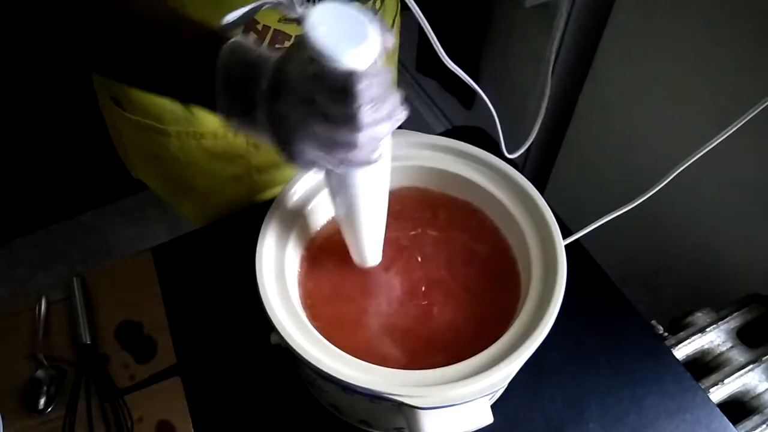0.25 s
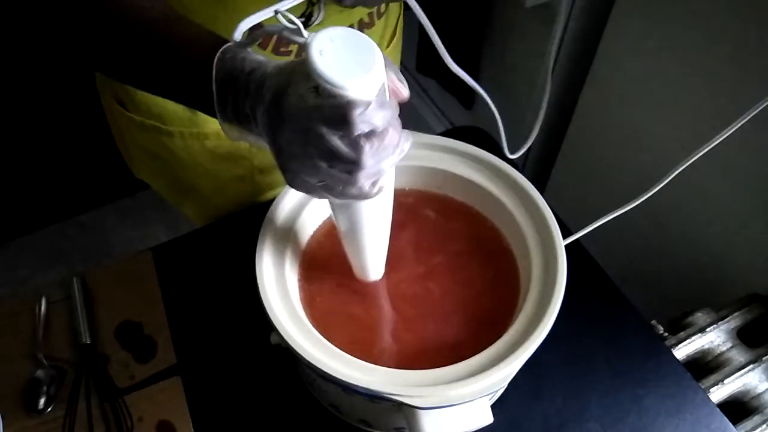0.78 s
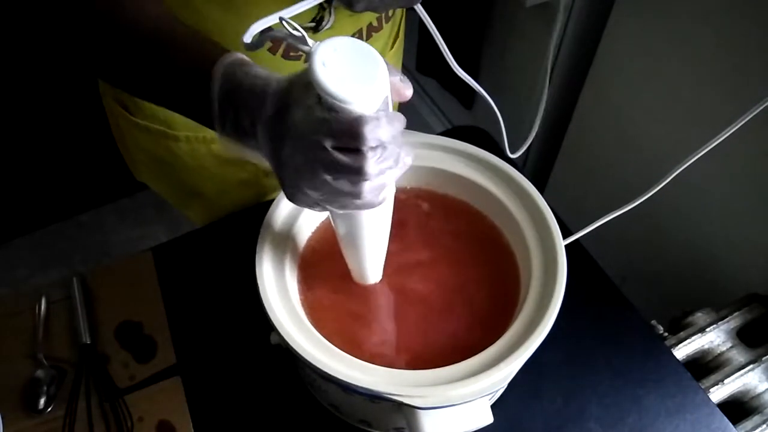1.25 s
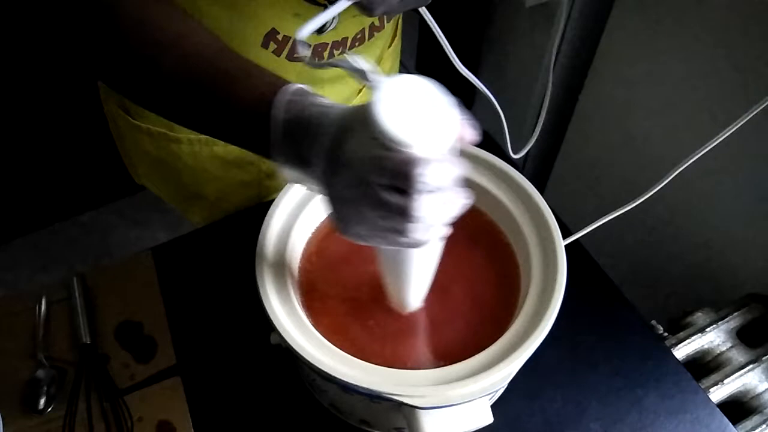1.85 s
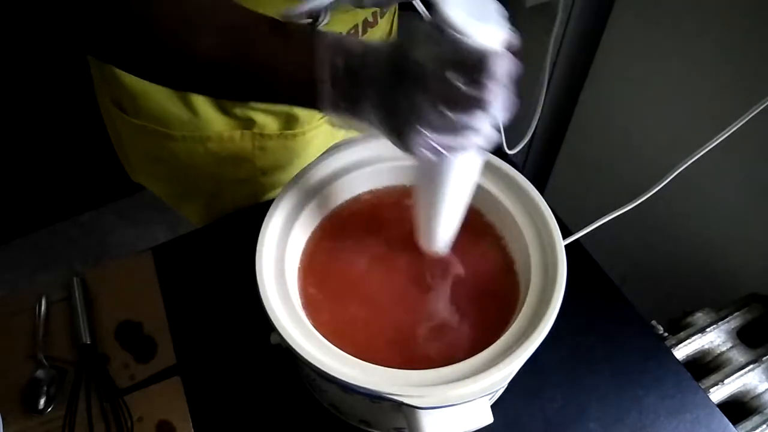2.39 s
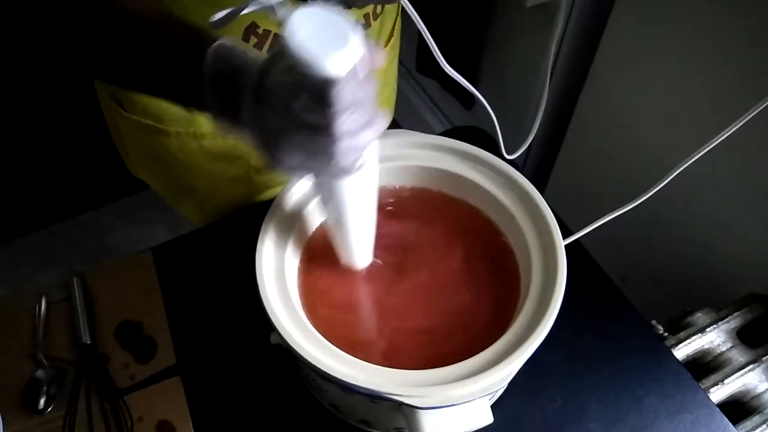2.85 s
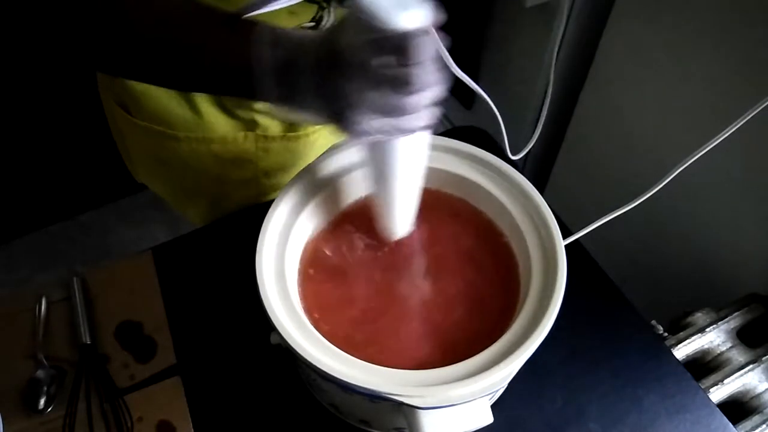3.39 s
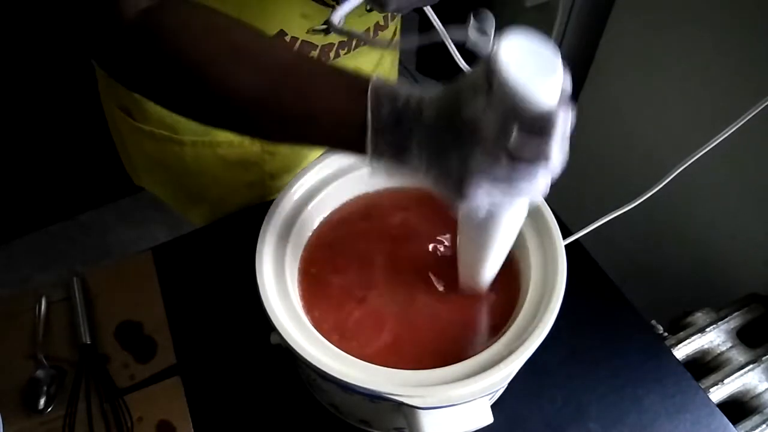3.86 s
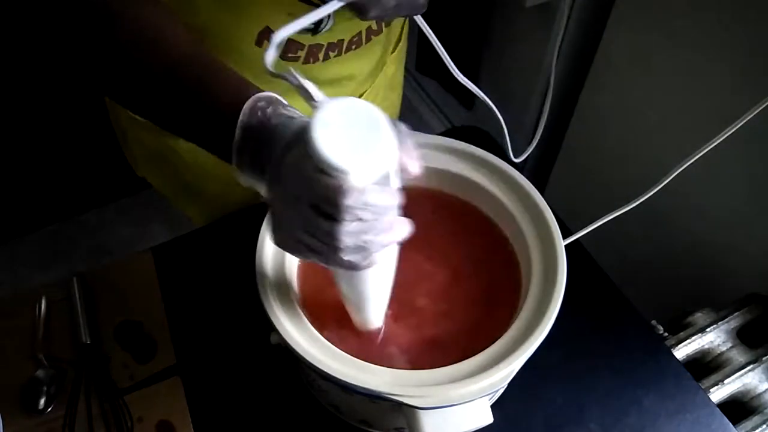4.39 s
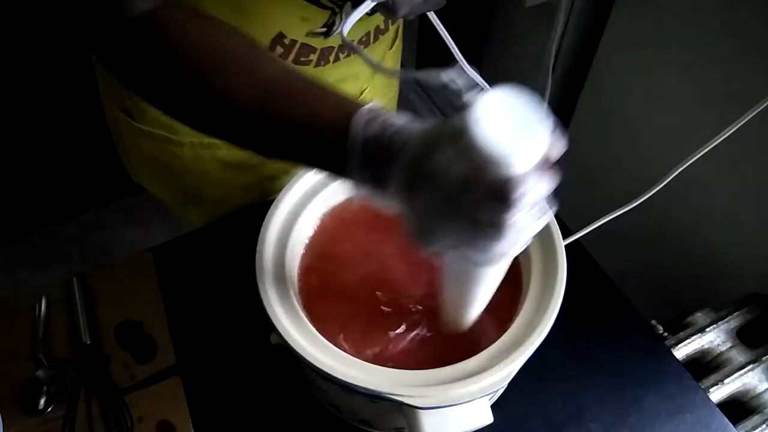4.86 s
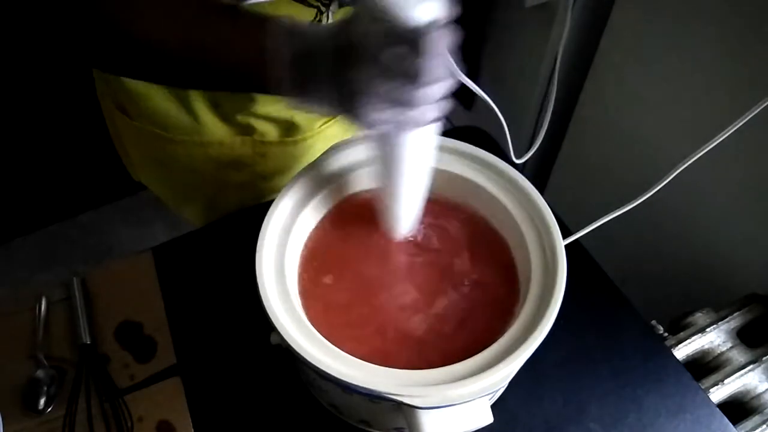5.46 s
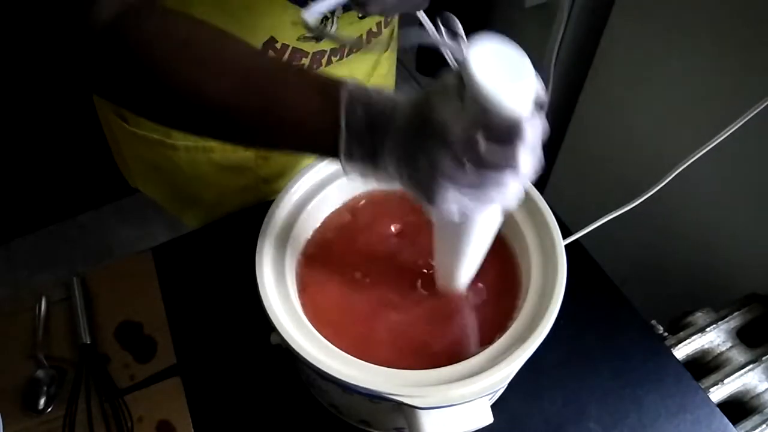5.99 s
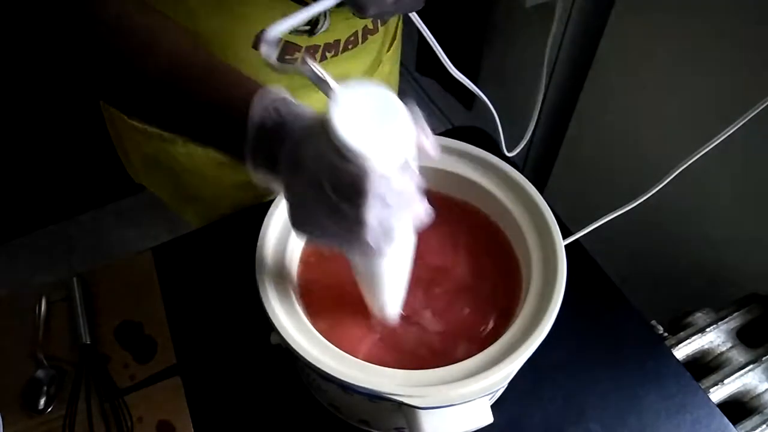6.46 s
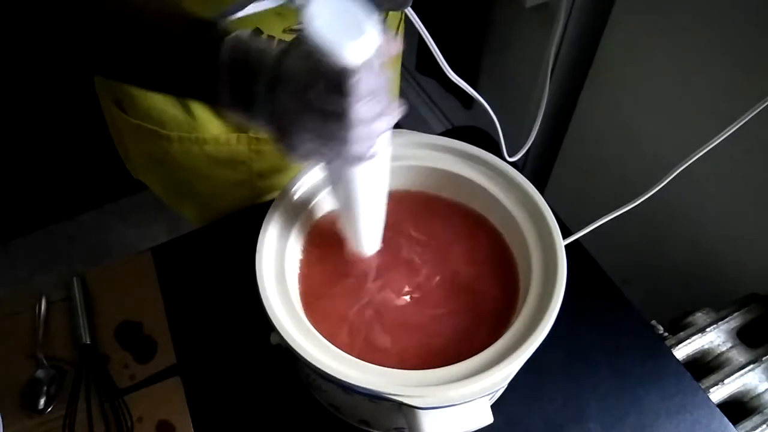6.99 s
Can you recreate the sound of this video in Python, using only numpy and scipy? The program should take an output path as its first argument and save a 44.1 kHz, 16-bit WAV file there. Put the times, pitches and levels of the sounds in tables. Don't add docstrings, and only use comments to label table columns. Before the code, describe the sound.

A hand blender runs under load with a buzzing edge, then coasts down to near silence with tiny brush ticks. A short burst follows and sinks, then the motor restarts and runs to the end, a nasal whine over rough airy roar, shifting as it is stirred. Low thuds of hand and pot. Close stereo microphone in a small kitchen.

```python
import sys
import numpy as np
from scipy import signal
from scipy.fft import rfft, irfft, next_fast_len
from scipy.io import wavfile
from scipy.ndimage import uniform_filter1d

SR = 44100
rng = np.random.default_rng(int(sys.argv[2]) if len(sys.argv) > 2 else 0)


def invert_db(level):
    return 10 ** (np.asarray(level, dtype=float) / 20)


def store_wav(level_fs):
    pcm = np.round(np.clip(np.atleast_2d(level_fs), -1, 1) * 32767)
    wavfile.write(sys.argv[1], SR, pcm.T.astype(np.int16))


N = 319107
T = np.arange(N) / SR
FULL_HZ = 205.9

# (frequency [Hz], left level [dB], right level [dB])
PORT_COLOUR = [(183, -7, -5.5), (283, -12.5, -16), (518, 2, 1), (745, 8.5, 6), (1250, 7, 9),
               (1920, 12, 8.5), (3120, 7, 5.5), (4260, 5.5, 3.2), (5340, -3.5, -2.5), (8840, -6, -19.5),
               (10450, -3, -16), (12130, 3.5, -37), (13350, 0.5, -80), (14800, -17, -74.2)]
# (time [s], foot pressed on the pot, vents turned to the ports, twist of the handle)
HAND_MOVES = [(0.15, -0.5, 0, 0), (1.0, -0.88, 0.5, -0.5), (1.55, -0.79, 0.5, 1.18),
              (1.89, 0.99, 1.45, 0.8), (2.42, 1.87, 1.26, -1.46), (2.72, -0.55, 1.7, 0.37),
              (2.98, -0.95, 0.76, 1.99), (3.31, -1.48, 0.52, -2), (3.97, 0.8, 0.43, -0.26),
              (4.43, -1.36, -0.27, 2), (4.68, -0.12, 0, 1.18), (4.86, -0.24, -0.2, 1.23),
              (5.28, 1.68, 0.92, -2.33), (5.65, -2.02, -0.2, -0.06), (6.03, 1.34, -1.5, -1.56),
              (6.65, 0.95, -1.55, 2.23), (7.02, -2, -1.53, -0.96), (7.2, -0.56, -1.2, 0.7)]


def hand_curves():
    times, *moves = np.transpose(HAND_MOVES)
    return [np.interp(T, times, move) for move in moves]


def follow_hand(db, *db_per_move):
    return db + np.dot(db_per_move, hand_curves())


def walk(rate):
    knots = np.arange(0, N * rate / SR + 1, 1 / 8)
    levels = np.repeat(rng.standard_normal(len(knots) // 8 + 1), 8)
    soft = 1.3 * uniform_filter1d(uniform_filter1d(levels, size=8), size=8)
    return np.interp(np.arange(N) * rate / SR, knots, soft[:len(knots)])


def bell(centre_s, db, spread_s):
    return db * np.exp(-.5 * ((T - centre_s) / spread_s) ** 2)


def level_at(table, hz, column=1):
    table = np.array(table)
    return np.interp(np.log(hz + 1), np.log(table[:, 0]), table[:, column])


def unit(x):
    return x / np.sqrt(np.mean(x ** 2))


def colour(noise, table):
    size = next_fast_len(N)
    hz = np.arange(size // 2 + 1) * SR / size
    return unit(irfft(rfft(noise, size) * invert_db(level_at(table, hz)), size)[..., :N])


def filtered(x, order, hz, kind="low"):
    return signal.sosfiltfilt(signal.butter(order, hz, kind, fs=SR, output="sos"), x)


def tone(phase, db, lag, pan_db, drift):
    lag = lag + drift * walk(1.7)
    pan_db = pan_db + 3.2 * drift * walk(2.37)
    share = np.arctan(invert_db(-pan_db))
    left = np.cos(share) * np.sin(phase)
    right = -np.sin(share) * np.sin(phase - lag)
    return 2 * invert_db(db) * np.array([left, right])


def shaft_speed():
    # (on [s], off [s], full shaft speed [Hz], roar level [dB], coasting time [s])
    presses = [
        (-1, .275, 164, -4.5, .11),
        (.838, 1.065, 206, .5, .17),
        (1.312, 9, 207.3, 0, .17),
    ]
    spin_up_s, friction_hz = .052, 8
    press_hz, twist_hz = 0.335, -0.202
    hz, roar_db = np.zeros(N), np.zeros(N)
    for on, off, top_hz, level_db, coast_s in presses:
        start_hz = hz[max(int(on * SR), 0)]
        held_s = np.clip(np.minimum(T, off) - on, 0, None)
        up_hz = top_hz - (top_hz - start_hz) * np.exp(-held_s / spin_up_s)
        slowing = np.exp(-np.clip(T - off, 0, None) / coast_s)
        run_hz = (up_hz + friction_hz) * slowing - friction_hz
        hz = np.where(T >= on, np.maximum(run_hz, 3), hz)
        roar_db = np.where(T >= on, level_db, roar_db)
    press, _, twist = hand_curves()
    return hz * (1 + (press_hz * press + twist_hz * twist) / FULL_HZ), roar_db


def whine(turn, throb, hz, fade_db):
    # (order, level [dB], per press [dB], per turn [dB], per twist [dB])
    main_orders = [(1, -49, 2, -1.2, 0.4), (2, -48.5, -1, 1.0, 1.8), (3, -41, -0.1, 1, 1.5),
                   (4, -36, 0.3, 1.35, 2.3), (5, -42.5, 0.6, 0.3, 3.5), (6, -40, -2.3, 0.9, -1),
                   (8, -44, -8, 1, 0.5), (9, -46.2, -2, 2.4, -0.8)]
    # (lag from opposition [rad], lag per press [rad],
    # lag per twist [rad], left minus right per press [dB], left minus right per twist [dB])
    path_bends = [(0.62, -0.067, -0.022, 1.4, -.7), (-0.21, -0.19, 0.57, -2.4, -1.4),
                  (0.28, -0.15, 0.0076, -4.5, -0.3), (0.57, 0.24, 0.07, .01, -0.8),
                  (1.4, -0.11, 0.3, -1.3, 4), (-0.46, -0.89, 0.55, 4, -1), (-0.85, -0.028, 0.026, -0.2, .3),
                  (-0.58, 0.45, -.61, 3.5, 3)]
    # (order, level [dB])
    weak_orders = [(7, -77), (10, -47.5), (11, -70), (12, -50), (13, -48.5), (20, -56.5), (24, -50.5)]
    # (lag from opposition [rad], left minus right [dB])
    arrivals = [(0.64, 3.5), (1.0, -2.3), (0.64, 0.1), (0.66, 2.4), (1.45, 2.7), (-1.24, -3.5), (1.01, 2.5),
                (-0.9, 3.6), (-1.25, 0.5), (-1.01, 2.8), (-0.99, 1.6), (-1.35, 2.2), (-1.23, -0.2)]
    # (time [s], order, level [dB], spread [s])
    swells = [(1.06, 4, 4, .06), (1.9, 4, 7, .13), (2.43, 3, -7, .08), (2.67, 3, 9, .05),
              (2.75, 1, 2, 0.15), (2.75, 4, -5, 0.059), (2.75, 8, 7, .08), (2.99, 4, -14, .05),
              (3.35, 6, -3.5, .12), (3.63, 1, -4, 0.058), (3.75, 3, -4, 0.039), (4.07, 1, 6, 0.11),
              (4.45, 2, 0, 0.11), (4.51, 9, 10, 0.12), (4.71, 8, -5, .05), (4.75, 1, -8, 0.1),
              (4.86, 4, 5, .12), (5.11, 3, 2.5, 0.2), (5.23, 1, 6.5, 0.27), (5.43, 6, -10, 0.055),
              (5.51, 3, 6, 0.039), (5.63, 4, 2, 0.046), (5.81, 4, 4, .04), (5.87, 1, -6, .05),
              (5.97, 4, 4, .07), (6.35, 8, 18, 0.066), (6.58, 4, 5, .1), (6.99, 4, 7.5, .08),
              (7.06, 8, 3, .07), (7.15, 6, -19, .12)]
    levels = {round(order): follow_hand(*row) for order, *row in main_orders}
    bends = dict(zip(levels, path_bends))
    for centre_s, order, swell_db, spread_s in swells:
        levels[round(order)] += bell(centre_s, swell_db, spread_s)
    for order, level_db in weak_orders:
        levels[order] = level_db + 0.53 * (levels[8] + 43.0) + 0.54 * walk(2.65)
    press, _, twist = hand_curves()
    out = 0
    for order, level_db in levels.items():
        shake = min(.06 * order, .34)
        wobbly_turn = turn + .04 * walk(25)
        phase = order * wobbly_turn + shake * np.sin(throb) + 2 * np.pi * rng.random()
        glide_db = level_at(PORT_COLOUR, order * hz) - level_at(PORT_COLOUR, order * FULL_HZ)
        lag, pan_db = arrivals[min(int(order), len(arrivals)) - 1]
        if order in bends:
            lag, lag_press, lag_twist, press_db, twist_db = bends[order]
            lag = lag + lag_press * press + lag_twist * twist
            pan_db = pan_db + press_db * press + twist_db * twist
        level_db = level_db + glide_db + fade_db + 2.1 * walk(10)
        out = out + tone(phase, level_db, lag, pan_db, drift=.17) * (1 + .3 * shake * np.sin(throb))
    return out


def motor_hum(throb, fade_db):
    level_db = follow_hand(-62, -2.3, -1.5, -.9) + fade_db + 2.0 * walk(5.5)
    return tone(throb, level_db, 0.14, 1.05, drift=.07)


def buzz():
    # (frequency [Hz], level [dB])
    loose_parts = [(552, -54), (597, -52), (1148, -43), (1208, -47), (1372, -51), (1392, -60), (1700, -54)]
    fade_db = -260 * np.clip(T - 0.27, 0, 1)
    out = 0
    for hz, db in loose_parts:
        out = out + tone(2 * np.pi * hz * T + 1.37 * walk(22.7), db + fade_db, 0.57, -11.0, drift=0.51)
    return out


def ring(db):
    t60_s, tail_db = 0.62, -11
    keep = np.exp(-2 * np.log(1000) / (t60_s * SR))
    power = invert_db(2 * db)
    tail = signal.lfilter([1 - keep], [1, -keep], power, zi=[power[0]])[0]
    return 10 * np.log10(power + invert_db(2 * tail_db) * tail)


def puffed_noise(turn, throb, hz, size):
    # (frequency [Hz], left-right correlation)
    likeness = [(60, -0.62), (130, -0.92), (290, -0.73), (640, -0.77), (1410, -0.45), (3100, -0.24),
                (6820, 0.024), (15000, 0.045)]
    turn_puff = .1 * np.cos(turn) + .08 * np.cos(2 * turn) + .05 * np.cos(4 * turn)
    puff = 1 + turn_puff + .09 * np.cos(throb)
    sparks = invert_db(2.1 * np.minimum(rng.exponential(size=(2, N)), 5.5))
    first, second = rfft(rng.standard_normal((2, N)) * puff * sparks, size)
    alike = np.clip(1.1 * level_at(likeness, hz), -.97, .97)
    left = first * invert_db(level_at(PORT_COLOUR, hz))
    right = (alike * first + np.sqrt(1 - alike ** 2) * second) * invert_db(level_at(PORT_COLOUR, hz, column=2))
    return np.array([left, right])


def pot_wall(out):
    delay_s, share, until_s = .00032, .92, .7
    end = int(until_s * SR)
    echo = filtered(out[:, :end], 2, [1800, 7000], "band")
    out[:, :end] -= share * np.roll(echo, round(delay_s * SR), axis=1)
    vents = filtered(out[0, :end], 2, [11500, 14500], "band")
    churn = filtered(out[0, :end], 2, 1200)
    out[0, :end] += 1.2 * vents - 0.61 * churn
    return out


def roar(turn, throb, motor_db, slow_db):
    # (level [dB], per press [dB], per turn [dB], per twist [dB], extra fall per dB of
    # slowing [dB])
    roar_parts = [
        (-37.5, 0.04, 0.63, 0.27, 0),
        (-34.5, -0.83, 1.15, 0.37, 0.54),
        (-36, -1, 1.64, -0.2, 0.9),
        (-39, -1.35, 3, -0.1, 0.43),
    ]
    # (time [s], fan level [dB], brush level [dB], spread [s])
    vent_shades = [
        (4.15, -1, -2, .12),
        (5.2, 2, 1, .1),
        (6.2, 1.5, -4, .1),
        (6.4, .5, .5, .08),
        (6.75, 2, 3, 0.2),
    ]
    size = next_fast_len(N)
    hz = np.arange(size // 2 + 1) * SR / size
    both = puffed_noise(turn, throb, hz, size)
    octave = np.log2(hz + 1)
    groups = np.zeros((4, 2, N))
    for centre in np.arange(7, 14.4, 1 / 3):
        window = np.cos(np.pi / 2 * np.clip(3 * (octave - centre), -1, 1)) ** 2
        band = irfft(both * window, size)[:, :N]
        flicker_db = 0.88 * np.array([walk(5.5), walk(5.5)]) + 1.13 * walk(13)
        groups[np.searchsorted([1300, 3000, 6000], 2 ** centre)] += band * invert_db(flicker_db)
    part_db = []
    for (*hand_row, slow_fall), extra_db in zip(roar_parts, [2.53, 1.55, 1.33, 2.42]):
        part_db.append(follow_hand(*hand_row) + slow_fall * slow_db + extra_db)
    for centre_s, fan_db, brush_db, spread_s in vent_shades:
        part_db[2] = part_db[2] + bell(centre_s, fan_db, spread_s)
        part_db[3] = part_db[3] + bell(centre_s, brush_db, spread_s)
    mixed = sum(unit(group) * invert_db(db) for group, db in zip(groups, part_db))
    return pot_wall(invert_db(motor_db) * mixed)


def surfaces(x):
    # (delay [ms], sway [ms], share of the sound)
    reflections = [(1.3, .15, .33), (2.9, .25, -.33), (4.7, .3, .3), (7.9, .4, -.27), (12.7, .4, .25),
                   (19.3, .4, .22)]
    out = x.copy()
    for delay_ms, sway_ms, share in reflections:
        place = np.arange(N) - (delay_ms + sway_ms * walk(1.6)) * SR / 1000
        out += share * np.array([np.interp(place, np.arange(N), port, left=0) for port in x])
    return out / np.sqrt(1 + sum(share ** 2 for *_, share in reflections))


def kitchen():
    # (frequency [Hz], level per Hz [dB])
    air_colour = [(180, -32), (300, 5.5), (763, -2.5), (884, -8), (1040, -2.5), (2100, -17), (7180, -19),
                  (12500, -21), (15000, -78)]
    # (frequency [Hz], level [dB])
    fridge_tones = [(295, -68), (472, -72)]
    hum = sum(tone(2 * np.pi * hz * T, db, 0.19, 0, drift=0.069) for hz, db in fridge_tones)
    return invert_db(-70.5) * colour(rng.standard_normal((2, N)), air_colour) + hum


def rumble():
    # (time [s], peak level [dB], time to die away by 60 dB [s])
    bumps = [(0.182, -51.5, 0.92), (0.6, -50, 0.56), (0.848, -45.5, 0.65), (1.152, -49, 0.68),
             (1.322, -50, 0.54), (1.481, -45, 0.38), (1.619, -60, 0.76), (2.409, -69, 0.48),
             (2.721, -55, 0.6), (2.902, -59, 0.45), (3.175, -66, 0.47), (3.644, -55, 0.66),
             (3.859, -61, 0.51), (4.477, -51, 0.45), (4.707, -47.5, 1), (5.196, -58, 0.6),
             (5.393, -52.5, 1), (5.549, -56, 0.6), (5.738, -46, 0.98), (6.045, -56, 0.5),
             (6.766, -55, 0.67), (7.099, -53, 0.69)]
    # (frequency [Hz], level per Hz [dB])
    thud_colour = [(15, -52), (25, -20), (41, -3), (64, 2), (123, -1), (182, -8), (298, -32), (450, -39),
                   (580, -74), (990, -120)]
    rise_s, bump_db = 0.014, -5.5
    size = invert_db(-69.5)
    for start_s, db, t60_s in bumps:
        fall_db = 60 * np.clip(T - start_s, 0, None) / t60_s
        size = size + invert_db(db + bump_db - fall_db) * np.clip((T - start_s) / rise_s, 0, 1)
    mid, side = colour(rng.standard_normal((2, N)), thud_colour) * size * invert_db(-2.5 + 2.5 * walk(9.1))
    return np.array([mid + invert_db(13.3) * side, mid - invert_db(12.7) * side])


def ticks():
    # (time [s], peak level [dB])
    brush_ticks = [(0.4523, -44.5), (0.526, -50), (0.57, -57), (0.6194, -62), (0.845, -37), (0.8589, -41),
                   (0.8819, -48), (0.907, -42), (1.288, -41), (1.324, -45)]
    gate = np.zeros(N)
    for start_s, db in brush_ticks:
        i = int(start_s * SR)
        gate[i:i + 800] += invert_db(db - 0.5) * np.exp(-np.arange(800) / (0.0026 * SR))
    click = gate * rng.standard_normal(N)
    bright = signal.sosfilt(signal.butter(2, 2200, "high", fs=SR, output="sos"), click)
    dull = signal.sosfilt(signal.butter(2, 6000, fs=SR, output="sos"), bright)
    left = signal.sosfilt(signal.butter(8, 13800, fs=SR, output="sos"), bright)
    return np.array([left, invert_db(-23) * dull])


def scene():
    hz, roar_db = shaft_speed()
    slow_db = 20 * np.log10(hz / FULL_HZ)
    turn = 2 * np.pi * np.cumsum(hz) / SR
    throb = 2 * np.pi * 120 * T
    fade_db = 4.1 * slow_db + 1.7 * np.minimum(roar_db, 0)
    motor_db = ring(roar_db + 1.32 * slow_db)
    motor = surfaces(roar(turn, throb, motor_db, np.maximum(slow_db, -14)))
    tones = whine(turn, throb, hz, fade_db) + motor_hum(throb, fade_db) + buzz()
    return tones + motor + kitchen() + rumble() + ticks()


def low_pass(x):
    return signal.sosfilt(signal.butter(12, 15640, fs=SR, output="sos"), x)


def record(dry):
    clipped = np.clip(dry, -.36, .36)
    mix = signal.sosfilt(signal.butter(4, 15100, fs=SR, output="sos"), clipped)
    return low_pass(mix)


dry = scene()
out = record(dry)
store_wav(out)
```